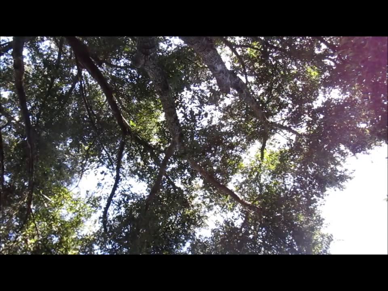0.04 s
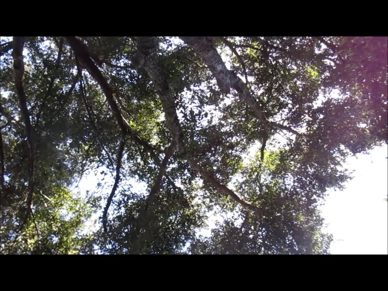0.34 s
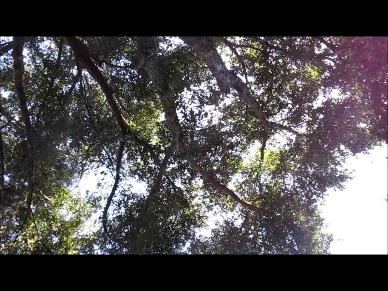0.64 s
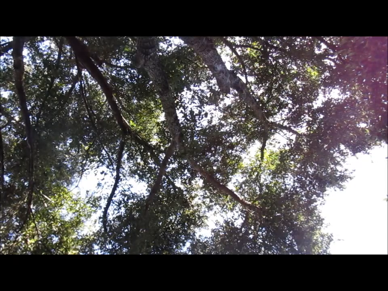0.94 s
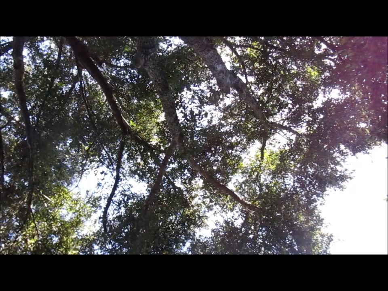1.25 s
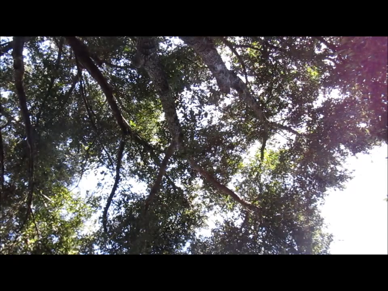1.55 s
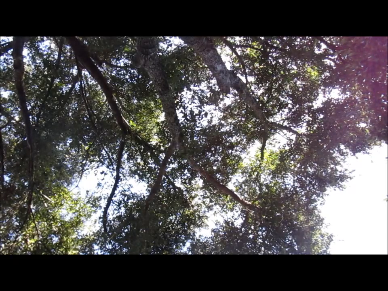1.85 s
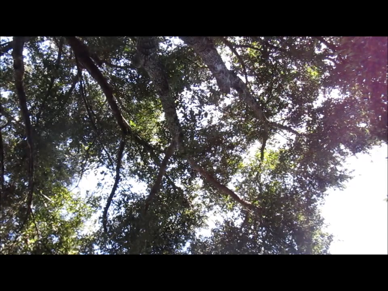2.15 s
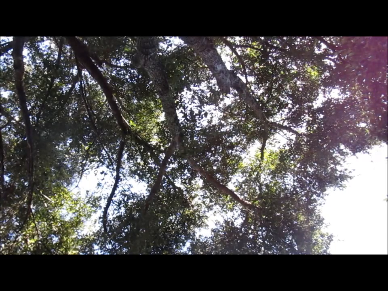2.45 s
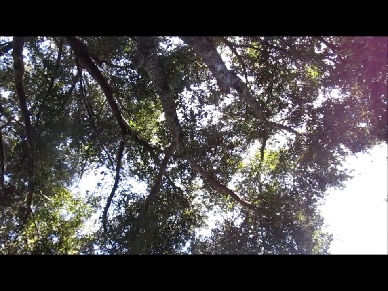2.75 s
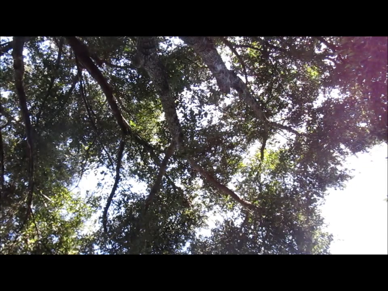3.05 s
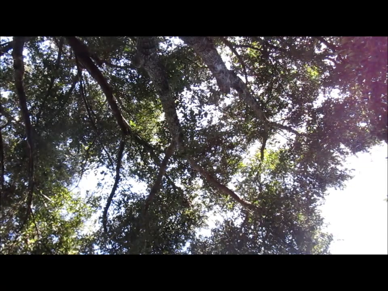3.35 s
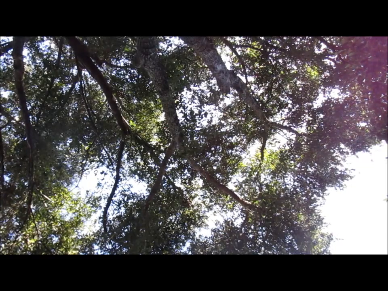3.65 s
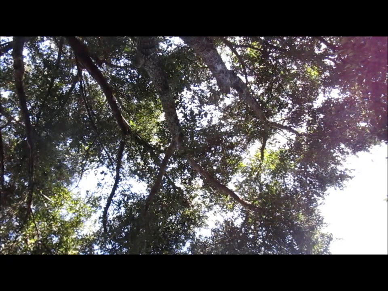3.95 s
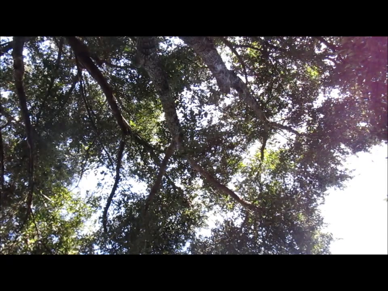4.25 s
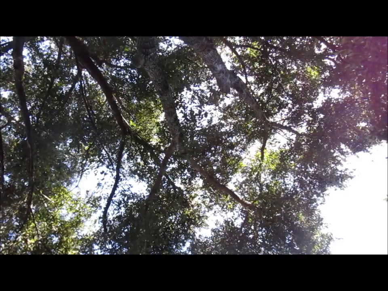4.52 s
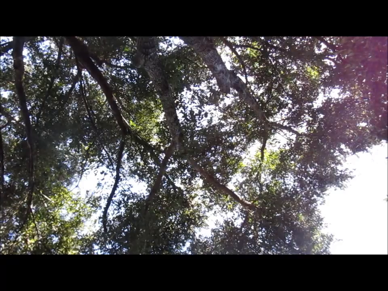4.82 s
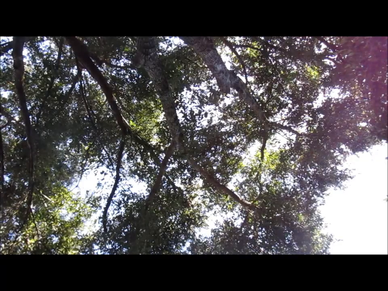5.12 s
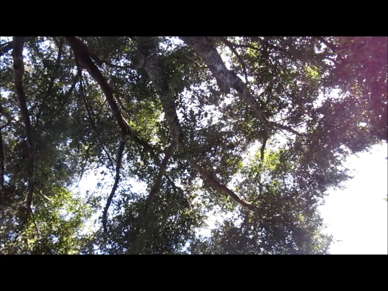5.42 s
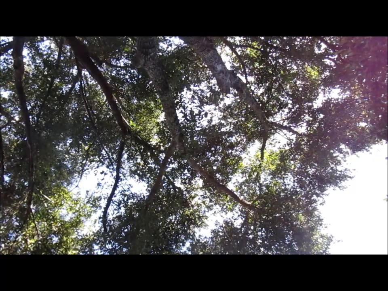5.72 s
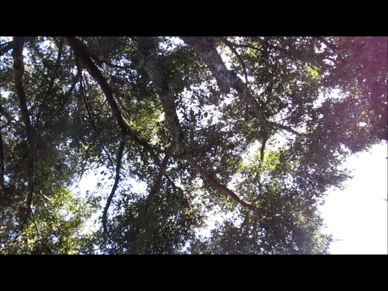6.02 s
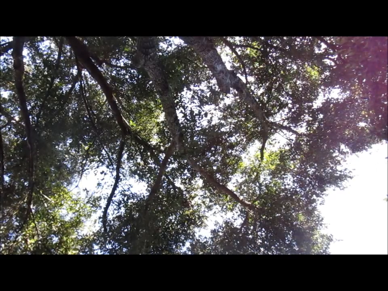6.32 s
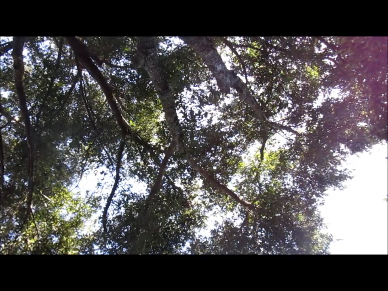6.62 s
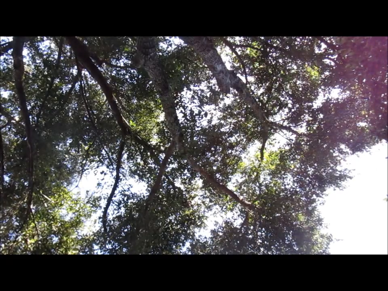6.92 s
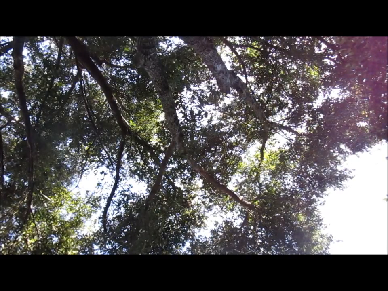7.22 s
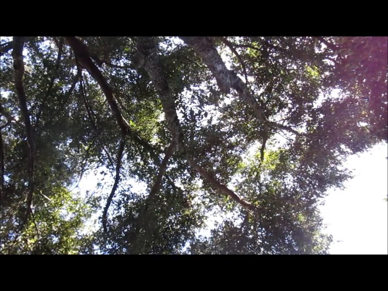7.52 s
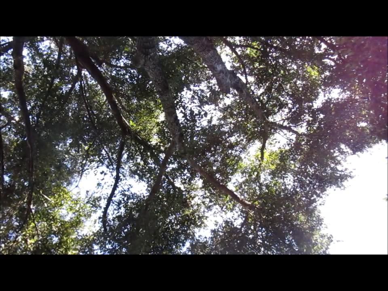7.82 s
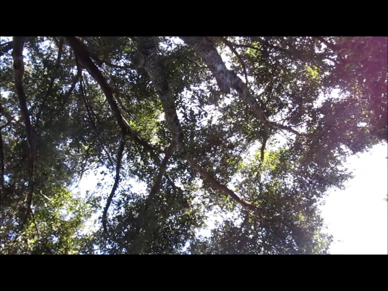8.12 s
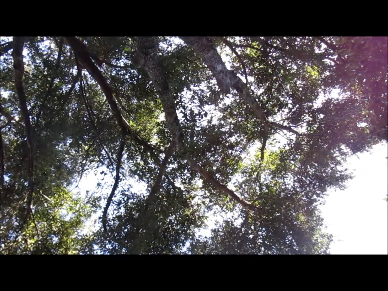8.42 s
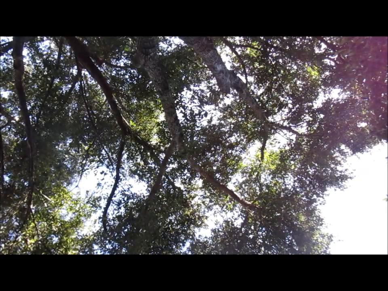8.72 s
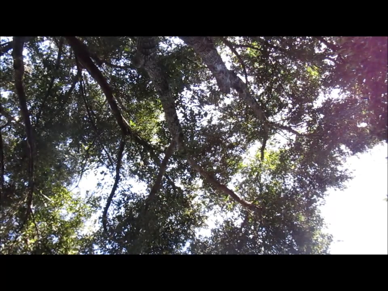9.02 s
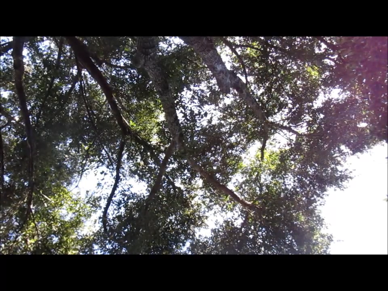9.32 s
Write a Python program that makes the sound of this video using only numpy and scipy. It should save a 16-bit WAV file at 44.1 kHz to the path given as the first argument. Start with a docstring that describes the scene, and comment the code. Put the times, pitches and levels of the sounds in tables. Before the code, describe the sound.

Acorns drop through leaves and land with sharp, hollow knocks while birds chirp and rasp faintly over a low, distant traffic rumble.

```python
"""Acorns falling under an oak

One microphone under the tree. Close by, acorns flick through the leaves and crack on the ground, a few
at a time; their hollow shells ring, some bounce, and trunks and foliage scatter each knock. Small birds
whistle high in the crown, a larger one (perhaps a jay) wheezes and rasps, and far traffic drones below."""
import sys
import numpy as np
from scipy import signal
from scipy.fft import rfft, irfft, next_fast_len
from scipy.io import wavfile
from scipy.ndimage import map_coordinates

SR = 44100
rng = np.random.default_rng(int(sys.argv[2]) if len(sys.argv) > 2 else 0)


def inscribe(sig):
    """Save sig as 16-bit PCM at rate SR to the path in sys.argv[1].

    A 1-D sig is mono; a 2-D sig holds one channel per row.
    Samples are clipped to [-1, 1] before scaling.
    """
    pcm = np.round(np.clip(np.atleast_2d(sig).T, -1, 1) * 32767)
    wavfile.write(sys.argv[1], SR, pcm.astype(np.int16))


N = 421596

# nuts landing, levels relative within each column: t/s, shell knock/dB, thud/dB, tick/dB, snap/dB,
# shell pitch/Hz, hollow ring/dB, litter crunch/dB, first flight/s (a bounce only if over 4 ms)
LANDINGS = [(0.3217, -38.5, -32, -29.5, -56, 2280, 5, 3, 0.014),
            (0.377, -48, -28.5, -35.5, -66, 2040, 5, -1.5, 0.0038),
            (0.543, -36, -52, -35, -61, 1700, 2, -8.5, .018),
            (0.852, -42, -53, -36.5, -52, 1600, 3, -4, 0.0016),
            (1.142, -40, -53, -35, -43, 2290, 2, -2.5, 0.00095),
            (1.3631, -36.5, -51, -30, -55, 2390, 8, -8, .011), (1.415, -49, -57, -41, -57, 2260, 2, -2, 0),
            (2.6025, -39.5, -33, -51, -62, 2680, 8, -10, 0),
            (3.7761, -46, -45, -60, -61, 2100, 5, -1, 0.0039),
            (3.8538, -41, -55, -58, -65, 2300, 12, -11, 0.0018),
            (3.9142, -57, -64, -45, -51, 1860, 3, -2, 0.0047),
            (4.1976, -34.5, -34, -41, -56, 1960, 6, -7, 0.0006),
            (4.3044, -38, -39, -40.5, -56, 1800, 5, -3, 0.0059),
            (4.4728, -46.5, -64, -48, -70, 2370, 6, -11, 0),
            (7.4122, -41, -53, -44, -50, 1730, 11, -1.5, 0.0012),
            (7.4727, -26.5, -16, -40, -51, 1849, 10.5, -1, .0145),
            (7.5366, -34, -36, -43, -65, 1400, 8, -1.5, 0.00072),
            (7.5853, -55, -43, -36, -53, 1710, 6, 0, 0.0015),
            (7.7912, -44.5, -32.5, -61, -76, 1802, 10, 0, 0.0021),
            (7.8443, -39.5, -31, -55, -59, 2100, 12, 0.5, 0.0003),
            (7.9447, -30.5, -25, -42, -49, 1870, 12, 0, 0.001),
            (7.997, -16.5, -8, -14.5, -27.5, 2004, 5.5, -3.5, 0.0069),
            (8.0552, -25.5, -22, -39, -44, 2030, 4, -5, 0.0044),
            (8.456, -32, -52, -30.5, -62, 2870, 13, -9, 0.001),
            (9.3697, -26.5, -39, -22.5, -24.5, 2770, 12, -5.5, 0.0065),
            (9.5, -47, -55, -35.5, -43, 2490, 3, -4, 0)]
# spectra of a landing's shell knock, ground thud, tick and sharp snap: f/Hz, level/dB
SHELL = [(150, -76), (400, -6), (800, -21), (1100, -1), (1450, 2), (2000, 6.5), (2600, 5), (3300, -1),
         (4200, -5), (6000, -24.5), (10000, -113)]
THUD = [(100, -41), (210, -9.5), (280, 4), (460, 3), (600, -2.5), (690, 5.5), (810, -6), (925, 4.5),
        (1090, 3.5), (1330, 6.5), (2500, -9), (6000, -82)]
TICK = [(800, -56), (2500, -14), (4500, 3), (5500, 3.5), (7300, 0), (9200, -8.5), (12000, -58),
        (15500, -62)]
SNAP = [(2000, -112), (7000, -35), (9500, 8.5), (12000, 10), (13500, 1), (15500, 3.5)]
# nuts brushing through leaves and dry litter: t/s, relative body/dB, relative crackle/dB
LEAF_BRUSHES = [(0.1971, -38.5, -49.5), (0.339, -30.5, -44), (0.616, -46, -51), (1.716, -35, -45),
                (4.2303, -48, -46.5), (4.521, -42.5, -44), (5.541, -43, -43), (7.3092, -39.5, -72),
                (7.374, -42, -37), (7.5092, -30.5, -46.5), (7.826, -48, -61), (7.9478, -47, -35),
                (8.3763, -33, -52), (8.4502, -32.5, -48)]
# small birds' notes: t/s, length/s, start f/Hz, end f/Hz, relative level/dB, flutter/share of pitch
BIRD_NOTES = [(0.421, .48, 4110, 4090, -58, 0.0045), (0.53, .12, 6970, 6870, -48, .01),
              (1.058, 0.06, 6900, 6790, -48, .012), (1.251, .07, 5710, 5560, -42.5, 0.031),
              (2.23, .12, 5940, 5630, -40.5, .008), (2.573, 0.15, 6640, 6750, -50.5, .015),
              (2.58, .12, 7350, 7500, -52, .02), (2.722, 0.22, 3350, 3224, -53, 0.0054),
              (3.25, 0.27, 6720, 6980, -39, 0.019), (3.441, .14, 7150, 7200, -45, 0.017),
              (3.54, 0.13, 5780, 5560, -42, 0.0076), (3.737, 0.13, 7200, 7190, -51, 0.011),
              (4.734, 0.084, 6200, 6770, -45, 0.033), (4.796, .12, 7100, 7120, -48.5, .01),
              (5.08, 0.075, 5830, 5630, -42, 0.033), (5.22, .11, 6500, 6700, -47.5, 0.013),
              (5.367, 0.1, 4470, 4370, -54, .003), (5.704, .15, 4440, 4330, -50, .003),
              (6.40, .2, 6000, 6940, -54.5, 0.043), (6.319, .4, 4135, 4280, -55, .004),
              (6.638, 0.072, 5590, 5370, -42.5, .035), (7.04, 0.093, 3440, 3580, -53, .006),
              (8.19, 0.16, 6610, 6880, -57, .008), (8.662, 0.1, 5800, 5600, -52.5, .02),
              (9.06, 0.078, 6160, 6070, -41, .018), (9.122, 0.097, 5674, 5570, -42.5, .008)]
# the jay's calls: t/s, length/s, start f/Hz, end f/Hz, tone/dB, overtone boost/dB, rasp/dB, hiss/dB
JAY_CALLS = [(0, 0.19, 1664, 1547, -45, -6, -40, -52), (0.923, 0.08, 1300, 1354, -56, 6, -41, -64),
             (1.019, 0.051, 1146, 1093, -53, 4, -41.5, -64),
             (1.185, 0.13, 1657, 1635, -42, -15, -46.5, -68),
             (1.508, 0.26, 1487, 1373, -49, 2.5, -45.5, -72),
             (1.868, 0.094, 1280, 1340, -53.5, 12, -40.5, -64),
             (2.058, 0.34, 1284, 1207, -50.5, -5, -40, -53),
             (2.231, 0.41, 1357, 1247, -54.5, 6, -42, -58.5), (2.86, 0.18, 1192, 1235, -55, 7, -42.5, -61),
             (2.971, 0.27, 1376, 1270, -56, 14.5, -37, -48.5), (3.17, 0.15, 1500, 1574, -49, 5, -35, -44.5),
             (3.229, .33, 1622, 1552, -50, -2, -38, -43.5), (4.619, 0.089, 1770, 1680, -52, 2, -47, -62),
             (5.798, 0.26, 1900, 1696, -50, -2, -45.5, -60), (5.949, 0.34, 1520, 1603, -48, 2.5, -50, -64),
             (6.23, 0.21, 1624, 1710, -62, 4, -46.5, -59), (6.754, 0.073, 1250, 1303, -57, 7, -48, -70),
             (6.828, 0.27, 1414, 1442, -51.5, 5.5, -44, -68), (8.84, 0.41, 1346, 1268, -56, -2, -36.5, -45)]
# overtones of its wheeze: multiple of the pitch, relative level/dB
WHEEZE_OVERTONES = [(2, -1.5), (3, -35), (4, -21.5), (5, -20.5)]
# spectra of its rasp and hiss: f/Hz, level/dB
JAY_RASP = [(600, -42), (1100, -15), (1350, -3.5), (1900, 1), (2500, 4.5), (3000, -1), (3800, -3.5),
            (5000, -16), (8000, -35)]
JAY_HISS = [(3000, -31), (5500, 3), (7000, 5), (8500, -1.5), (10000, -9), (12000, -12.5), (15500, -30)]
# echo decay among the near trunks and in the deeper wood: f/Hz, t60/s
NEAR_TRUNKS = [(200, 0.54), (2000, 0.62), (6000, 0.5), (14000, 0.02)]
FAR_WOODS = [(200, 0.27), (2000, 0.83), (6000, 0.7), (14000, 0.2)]
# the nearer engine speeds up, then slowly runs down: t/s, firing rate/Hz, relative level/dB
LOW_ENGINE = [(0, 67, -48), (.75, 62, -37.5), (2.05, 61.5, -49), (2.3, 87, -38.5), (2.7, 89, -45),
              (3.45, 85.7, -33.5), (4.2, 83, -43), (4.85, 81, -42.5), (5.15, 80.4, -34), (6.2, 78.2, -41.5),
              (6.65, 74.5, -37), (7.75, 73, -48), (7.93, 77, -35), (9.0, 74.8, -34), (9.56, 67, -41)]
# a second engine at a nearly steady speed: t/s, relative level/dB
HIGH_ENGINE = [(0, -41.5), (1.5, -41.5), (2.5, -38.5), (3.3, -44), (5.2, -45.5), (8.2, -59), (8.7, -38),
               (9.56, -36.5)]
# spectra of the far road and the open air: f/Hz, level/dB
ROAD_RUMBLE = [(15, -10), (28, -2.5), (45, 1.5), (70, 1), (110, -4.5), (160, -9.5), (300, -15),
               (520, -17.5), (800, -29), (1500, -30.5), (3000, -100)]
OPEN_AIR = [(300, -14), (780, -6), (1050, -1), (2300, -3), (3300, -9), (4200, -9), (6500, -12), (9000, -18),
            (12000, -22), (15500, -28)]


def acorns(knock_db=26.5, thud_db=18, tick_db=19, snap_db=21, ring_width_hz=360, skirt_hz=2000,
           bounce_loss_db=5, flight_ratio=.92):
    """Close by, each nut rings its hollow shell, thumps and ticks; any bounces come sooner and weaker."""
    track, t = np.zeros(N), np.arange(SR // 8) / SR
    for s, knock, thud, tick, snap, pitch_hz, ring_db, litter_db, flight in LANDINGS:
        blow, contact_s = np.zeros(SR), 0
        for k in range(3 if flight > .004 else 1):
            impact = burst(t, t60=.027, crack=1.7)
            settling_litter = amp(litter_db) * burst(t, t60=.088, crack=0)
            add(blow, contact_s, amp(-k * bounce_loss_db) * (impact + settling_litter))
            contact_s += flight * flight_ratio ** k
        # nearby trunks answer at once, the deeper wood later
        add(blow, .006, amp(litter_db - 3) * scatter([1], NEAR_TRUNKS))
        add(blow, .03, amp(-20.5) * scatter([1], FAR_WOODS))
        parts = [(knock + knock_db, SHELL), (thud + thud_db, THUD),
                 (tick + tick_db, TICK), (snap + snap_db, SNAP)]
        # the shell's ring stands out of its neighbouring frequencies
        ring = lambda hz: bump(hz, pitch_hz, ring_width_hz) - bump(hz, pitch_hz, skirt_hz) / 2
        add(track, s, coloured(blow, lambda hz: blend(hz, parts) + ring_db * ring(hz)))
    return track


def leaves(body_db=-14, crackle_db=-13, crisp_db=-9, rise_s=.0094, t60=.3, grain_db=3):
    """A nut parts the leaves near the microphone: a quick swell of tiny uneven snaps."""
    track, t = np.zeros(N), np.arange(SR // 3) / SR
    for s, body, crackle in LEAF_BRUSHES:
        snaps = rng.standard_normal(len(t))
        snaps *= amp(grain_db * np.repeat(rng.standard_normal(len(t)), 64)[:len(t)])  # 64-sample grains
        snaps *= (1 - np.exp(-t / rise_s)) * amp(-60 * t / t60)
        middle = amp(body + body_db) * shaped(snaps, SHELL)
        treble = shaped(snaps, TICK) + amp(crisp_db) * shaped(snaps, SNAP)
        add(track, s - .008, middle + amp(crackle + crackle_db) * treble)
    return track


def birds(flutter_hz=330, fade_db=6.5, direct_db=-6, near_db=-11, far_db=-14):
    """Thin gliding notes from the crown overhead, some pure and some buzzy, smeared by the foliage."""
    song = np.zeros(N)
    for s, length, start_hz, end_hz, db, flutter in BIRD_NOTES:
        t = np.arange(round(length * SR)) / SR
        envelope = amp(db - fade_db * t / length) * gate(t, rise=.017, fall=.025)
        phase = glide(t, start_hz, end_hz, flutter * wobble(flutter_hz, len(t)))
        add(song, s, envelope * np.sqrt(2) * np.sin(phase))
    near = amp(near_db) * scatter(song, NEAR_TRUNKS)[:N]
    far = amp(far_db) * scatter(song, FAR_WOODS)[:N]
    return amp(direct_db) * song + near + far


def jay(waver=.02196, tone_rough=.018, rasp_rough=.0322, partial_db=6, grain_db=1.5, fade_db=9):
    """Among the trunks, a wavering reedy tone with a hiss and a hoarse rasp at a third of its pitch."""
    track = np.zeros(N)
    for s, length, start_hz, end_hz, tone_db, bright_db, rasp_db, hiss_db in JAY_CALLS:
        t = np.arange(round(length * SR)) / SR
        n = len(t)
        drift = waver * wobble(24.15, n)
        phase = glide(t, start_hz, end_hz, drift + tone_rough * wobble(603, n))
        overtones = sum(amp(db + bright_db) * np.sin(k * phase) for k, db in WHEEZE_OVERTONES)
        tone = np.sqrt(2) * (np.sin(phase) + overtones)
        rasp_phase = glide(t, start_hz, end_hz, drift + rasp_rough * wobble(800, n)) / 3
        # the rasp's partials each come and go
        buzz = sum(amp(partial_db * wobble(20, n)) * np.sin(k * rasp_phase + rng.uniform(0, 2 * np.pi))
                   for k in range(3, 13))
        rasp = unit(shaped(buzz, JAY_RASP) + amp(-1) * noise(JAY_RASP, n))
        voice = amp(tone_db) * tone + amp(rasp_db) * rasp + amp(hiss_db) * noise(JAY_HISS, n)
        # a call swells, weakens along its length and dies away
        effort_db = grain_db * wobble(60.3, n) - fade_db * t / length
        add(track, s, voice * gate(t / length, rise=.2, fall=.31) * amp(effort_db))
    return track + amp(-10) * scatter(track, NEAR_TRUNKS)[:N]


def engine(hz, db, octave_db, jitter_rad, waver_db=2):
    """A far exhaust note with a weak octave, fading in and out on its way."""
    phase = 2 * np.pi * np.cumsum(hz) / SR + jitter_rad * wobble(7)
    exhaust = np.sin(phase) + amp(octave_db) * np.sin(2 * phase)
    return amp(db + waver_db * wobble(8.2)) * np.sqrt(2) * exhaust


def background(rumble_db=-38, air_db=-51.5, high_hz=103.6, wander_hz=3.996):
    """A distant road rumbling with two engines in it, and the soft hiss of the open air."""
    rumble = amp(rumble_db + .12 * wobble(3.7)) * noise(ROAD_RUMBLE)
    air = amp(air_db + .44 * wobble(3.55)) * noise(OPEN_AIR)
    firing_hz, low_db = curves(LOW_ENGINE)
    high_db = curves(HIGH_ENGINE)[0]
    low = engine(firing_hz, low_db - 1, octave_db=-27, jitter_rad=.38)
    high = engine(high_hz + wander_hz * wobble(2), high_db - 5.5, octave_db=-15, jitter_rad=.42)
    return rumble + air + low + high


def scatter(x, decay):
    """A diffuse echo of x off trunks and foliage, each frequency dying at its own speed."""
    hz, t, spectrum = signal.stft(rng.standard_normal(SR), SR, nperseg=256)
    spectrum *= amp(-60 * t / along(decay, hz)[:, None])
    tail = signal.istft(spectrum, SR, nperseg=256)[1]
    return signal.fftconvolve(x, tail / np.linalg.norm(tail))


def burst(t, t60, crack, crack_t60=.006):
    """A dying crunch at energy 1; crack weights a hard onset of a few milliseconds."""
    envelope = crack * amp(-60 * t / crack_t60) + amp(-60 * t / t60)
    crunch = envelope * rng.choice([-1, 1], len(t))
    return crunch / np.linalg.norm(crunch)


def glide(t, start_hz, end_hz, flutter):
    """Phase of a pitch that slides evenly and flutters by the given shares."""
    return 2 * np.pi * np.cumsum(np.linspace(start_hz, end_hz, len(t)) * (1 + flutter)) / SR


def gate(t, rise, fall):
    """Attack, hold and release over the times t."""
    return np.clip(t / rise, 0, 1) * np.clip((t[-1] - t) / fall, 0, 1)


def wobble(rate, size=N):
    """A smooth random curve, rate knots a second."""
    knots = rng.standard_normal(int(size * rate / SR) + 4)
    return map_coordinates(knots, [np.arange(size) * rate / SR])


def coloured(x, gain_db):
    """x through the causal filter whose gain in dB is a function of frequency."""
    m = 2 * next_fast_len(len(x) // 2 + 4096)
    cepstrum = irfft(np.log(amp(gain_db(np.fft.rfftfreq(m, 1 / SR))) + 1e-6))
    cepstrum[1:m // 2] *= 2  # fold onto positive time for minimum phase
    cepstrum[m // 2 + 1:] = 0
    return irfft(rfft(x, m) * np.exp(rfft(cepstrum)))[:len(x)]


def shaped(x, spectrum):
    """x with the colour of an (f/Hz, level/dB) table, at rms 1."""
    return unit(coloured(x, lambda hz: along(spectrum, hz)))


def noise(spectrum, size=N):
    """Steady noise of the given colour, at rms 1."""
    return shaped(rng.standard_normal(size), spectrum)


def blend(hz, parts):
    """Gain in dB of several (level/dB, spectrum) parts sounding together."""
    power = sum((amp(db) * unit(amp(along(spectrum, hz)))) ** 2 for db, spectrum in parts)
    return 10 * np.log10(power)


def bump(hz, centre, width):
    """A bell of height 1 over frequency."""
    return 1 / (1 + ((hz - centre) / width) ** 2)


def along(points, hz):
    """(f/Hz, value) points read on a log axis."""
    f, values = np.transpose(points)
    return np.interp(np.log(hz + 1), np.log(f + 1), values)


def curves(rows):
    """One value per sample for each column after the time."""
    s, *columns = np.transpose(rows)
    return [np.interp(np.arange(N) / SR, s, column) for column in columns]


def add(track, s, sound):
    """Mix a sound into the track from time s."""
    part = track[max(round(s * SR), 0):][:len(sound)]
    part += sound[:len(part)]


def amp(db):
    """Decibels to gain."""
    return 10 ** (np.asarray(db) / 20)


def unit(x):
    """x at rms 1."""
    return x / np.sqrt(np.mean(x ** 2) + 1e-20)


def scene():
    """Everything heard from under the tree, in mono."""
    return (acorns() + leaves() + birds() + jay() + background())[None]


def record(dry, notch_hz=4850, notch_width_hz=280, notch_db=-14, top_hz=16000):
    """The microphone port notches the treble; the recorder clips at full scale and limits the band."""
    mic = coloured(dry[0], lambda hz: notch_db * bump(hz, notch_hz, notch_width_hz))
    clipped = np.clip(mic, -1, 1)
    m = next_fast_len(N + SR // 2)
    passband = np.fft.rfftfreq(m, 1 / SR) < top_hz
    return irfft(rfft(clipped, m) * passband, m)[None, :N]


dry = scene()
out = record(dry)
inscribe(out)
```